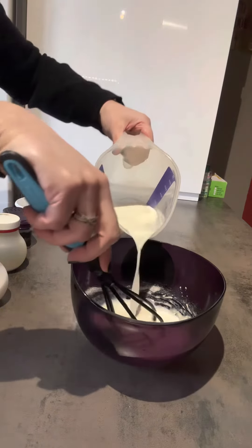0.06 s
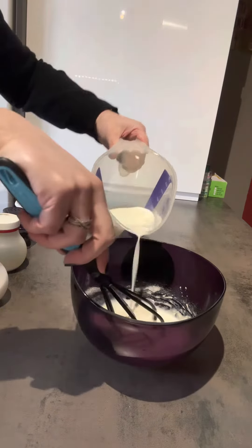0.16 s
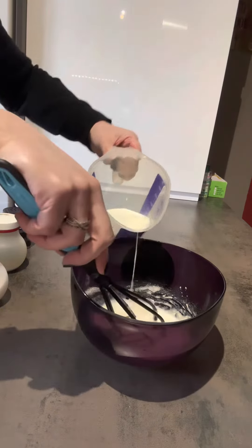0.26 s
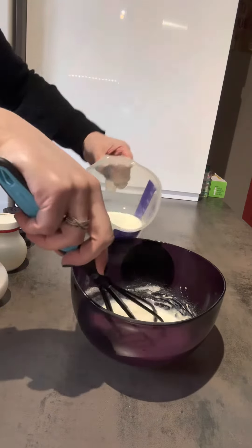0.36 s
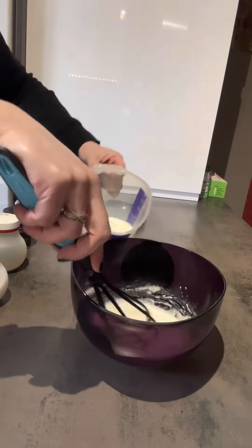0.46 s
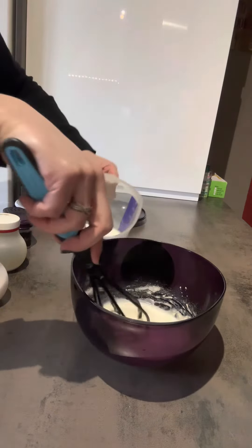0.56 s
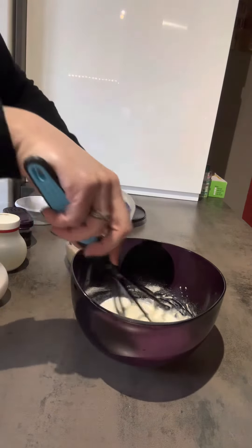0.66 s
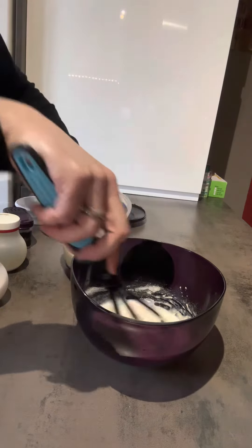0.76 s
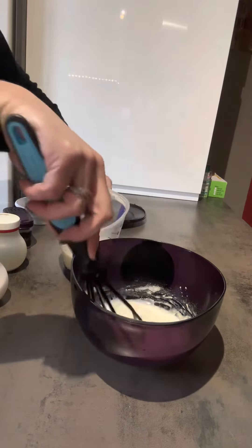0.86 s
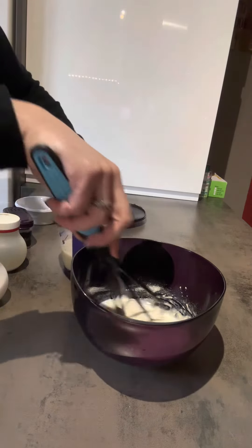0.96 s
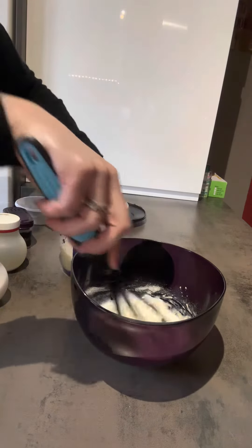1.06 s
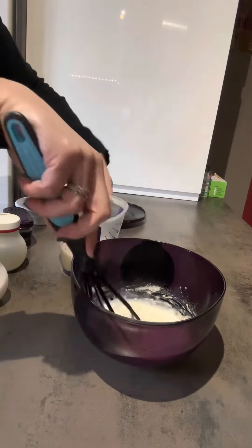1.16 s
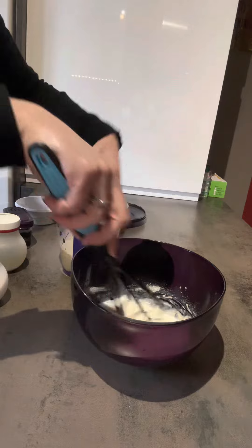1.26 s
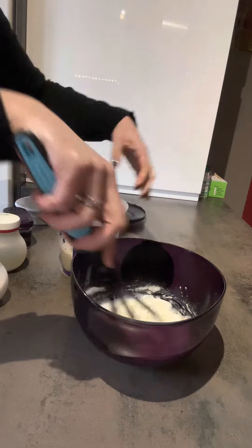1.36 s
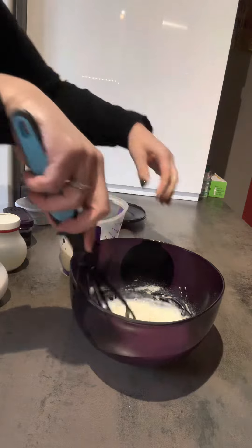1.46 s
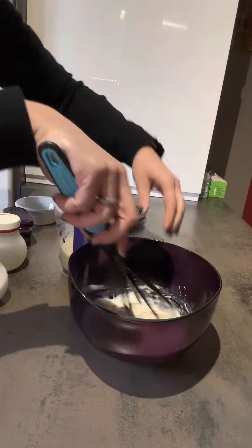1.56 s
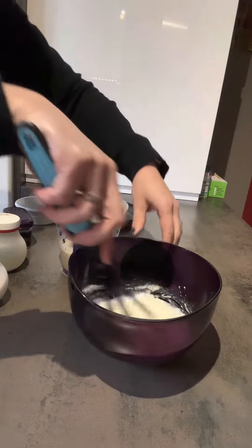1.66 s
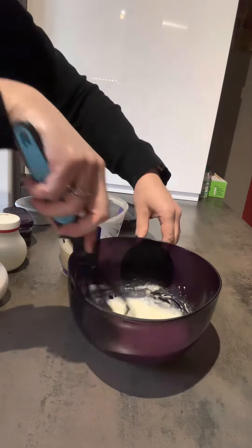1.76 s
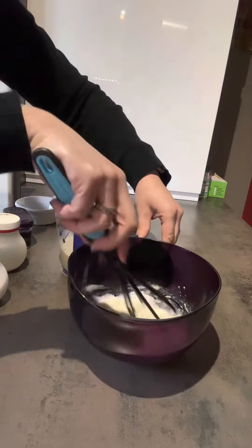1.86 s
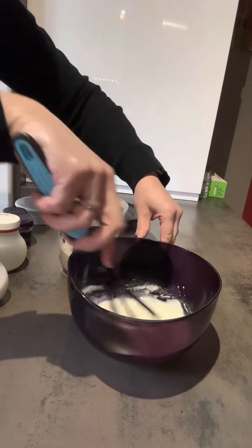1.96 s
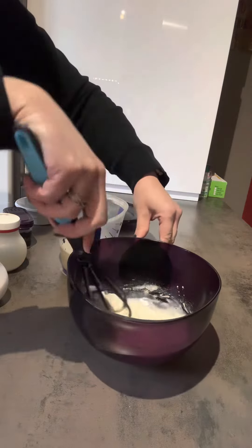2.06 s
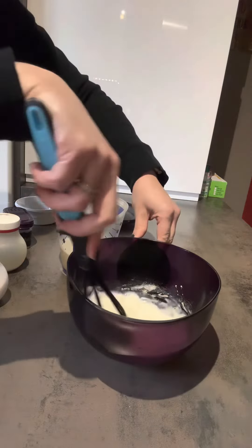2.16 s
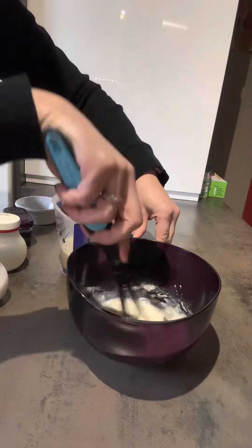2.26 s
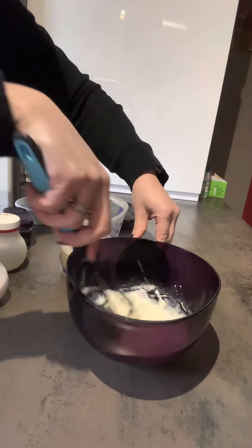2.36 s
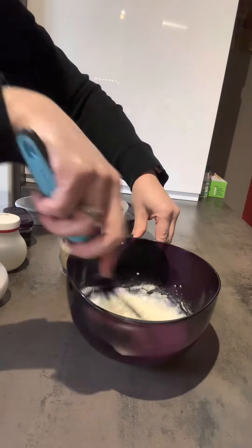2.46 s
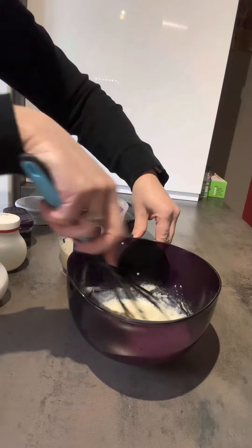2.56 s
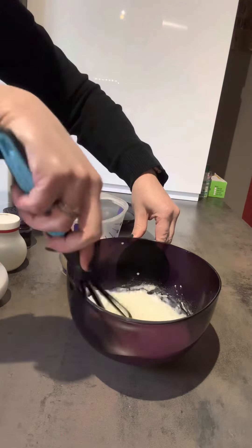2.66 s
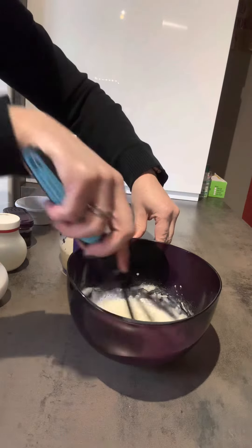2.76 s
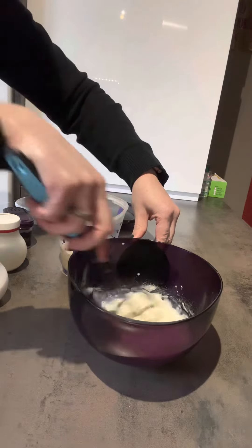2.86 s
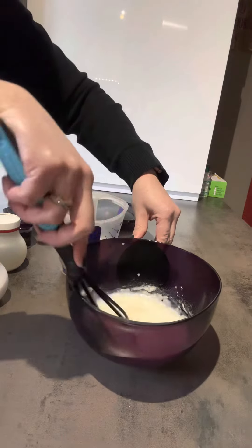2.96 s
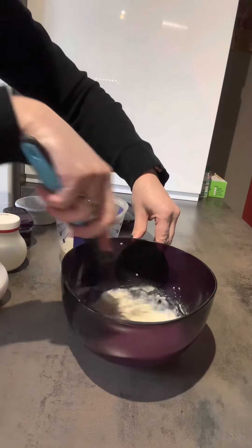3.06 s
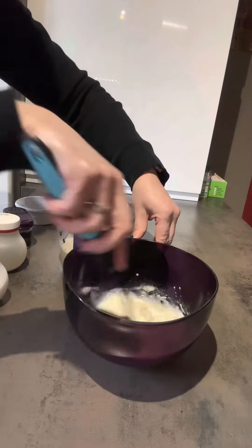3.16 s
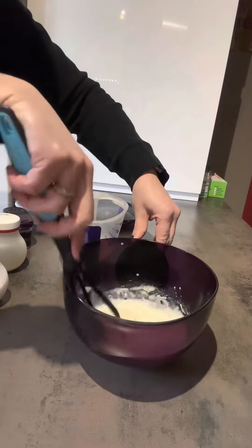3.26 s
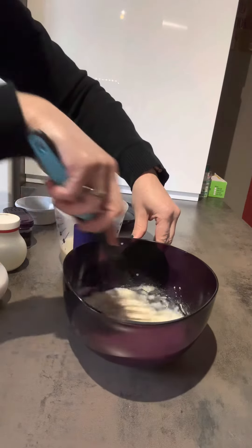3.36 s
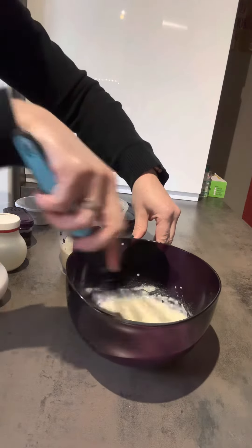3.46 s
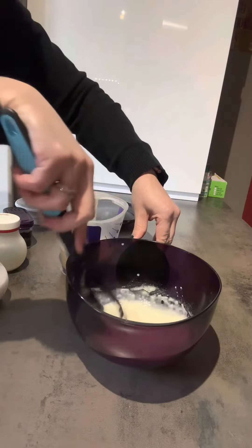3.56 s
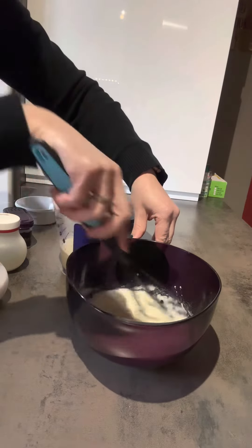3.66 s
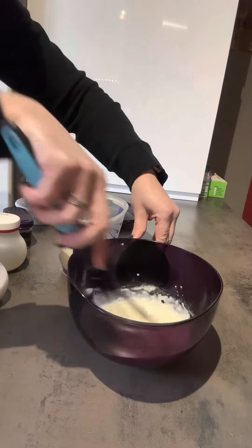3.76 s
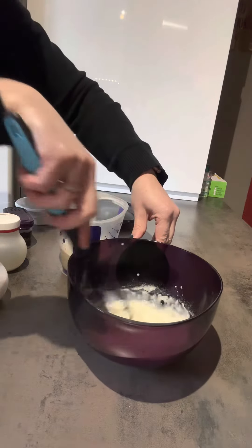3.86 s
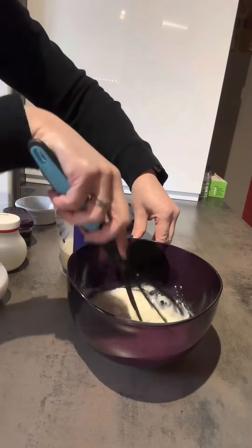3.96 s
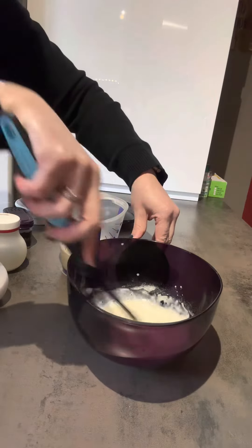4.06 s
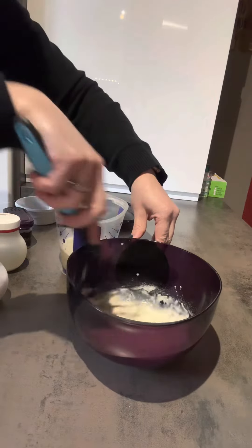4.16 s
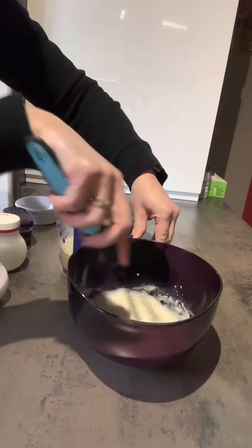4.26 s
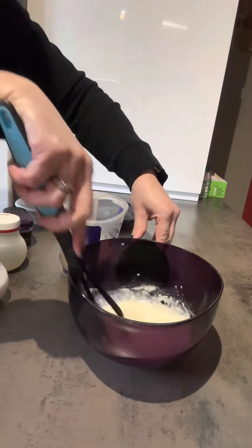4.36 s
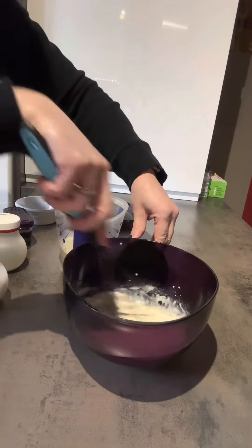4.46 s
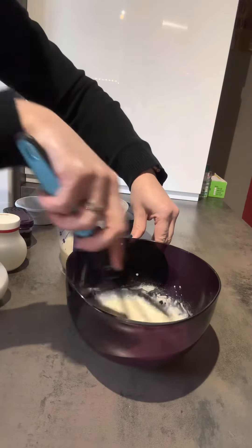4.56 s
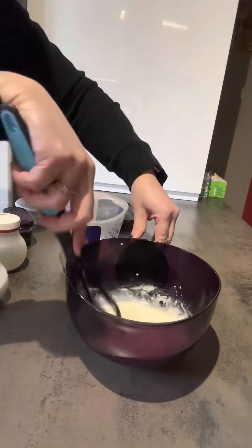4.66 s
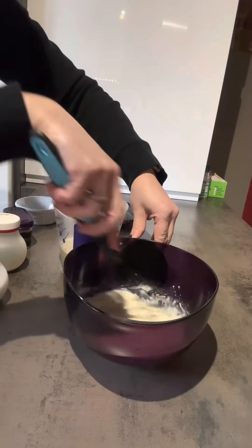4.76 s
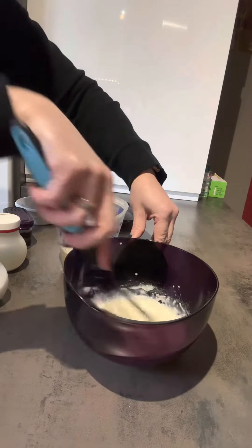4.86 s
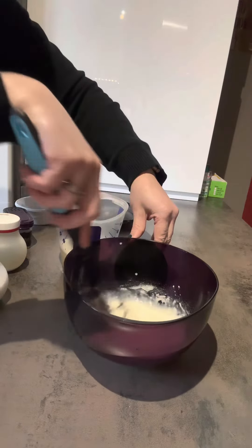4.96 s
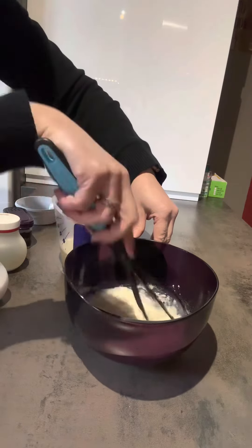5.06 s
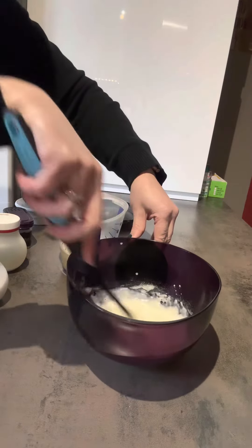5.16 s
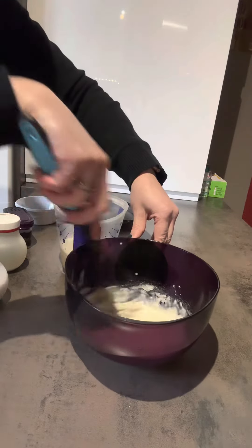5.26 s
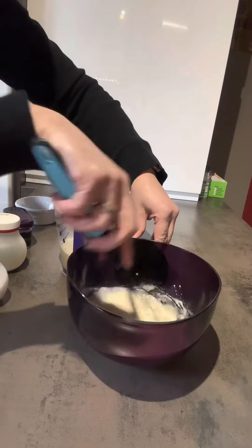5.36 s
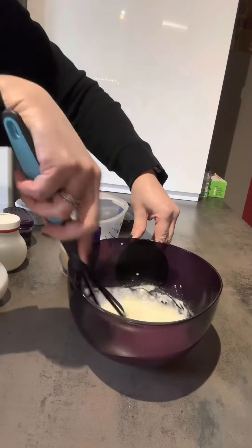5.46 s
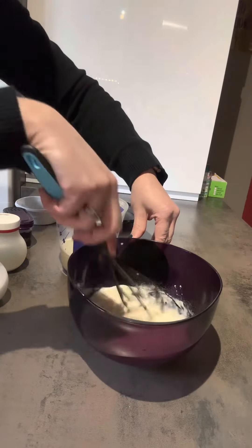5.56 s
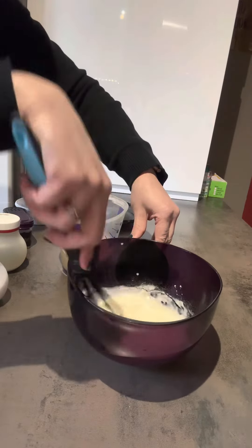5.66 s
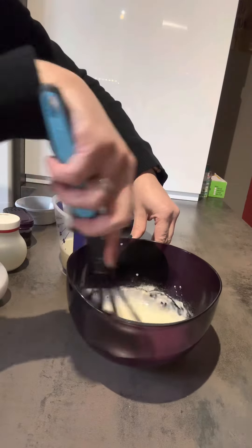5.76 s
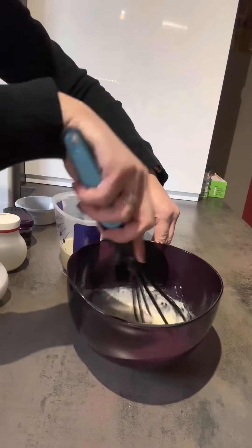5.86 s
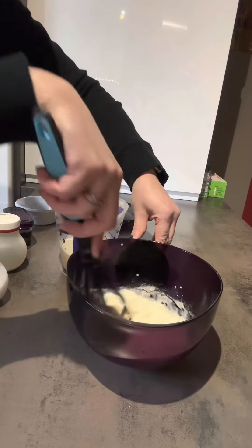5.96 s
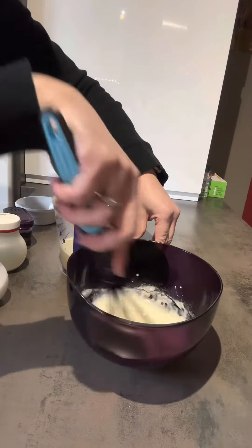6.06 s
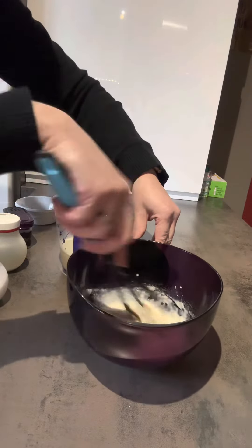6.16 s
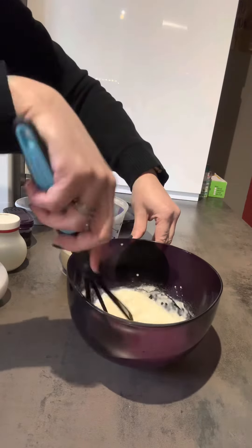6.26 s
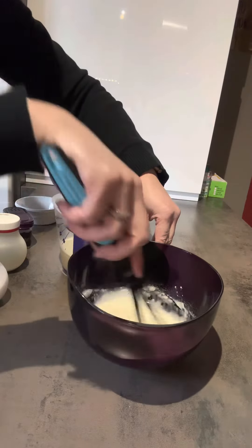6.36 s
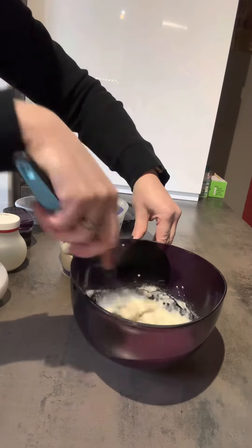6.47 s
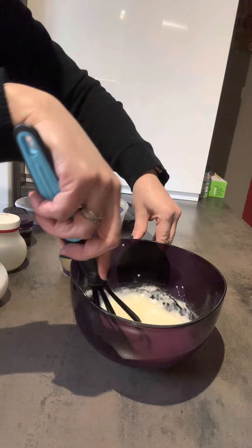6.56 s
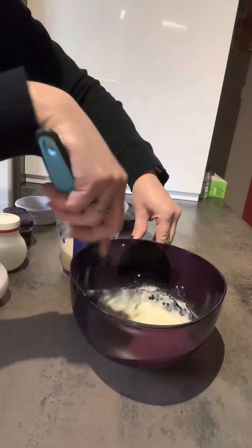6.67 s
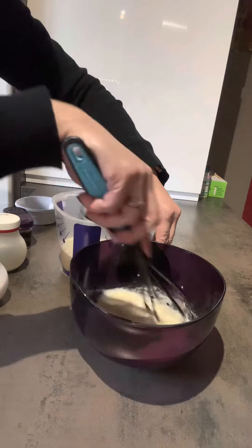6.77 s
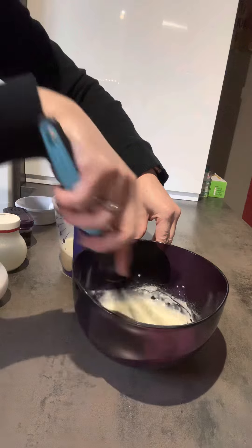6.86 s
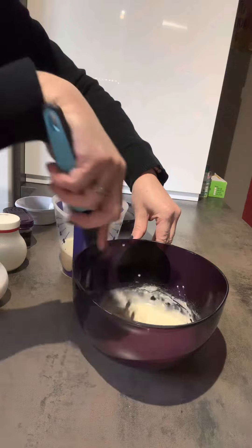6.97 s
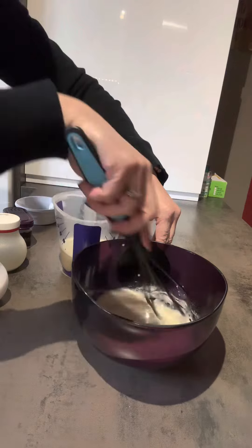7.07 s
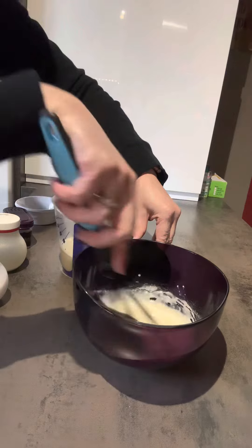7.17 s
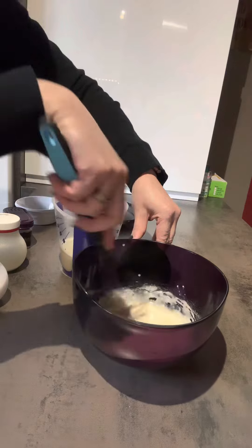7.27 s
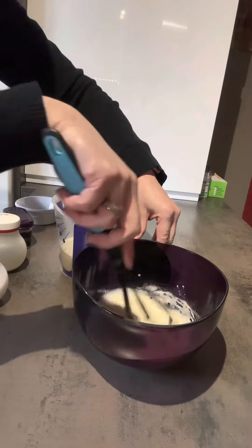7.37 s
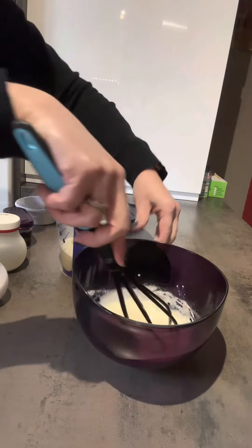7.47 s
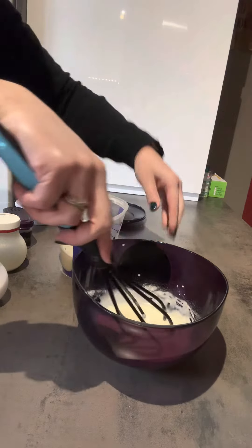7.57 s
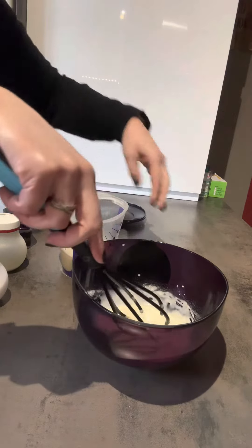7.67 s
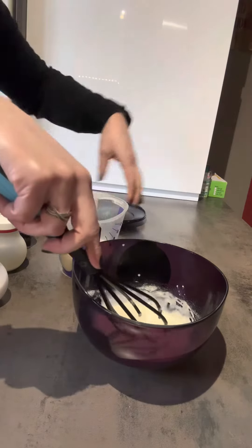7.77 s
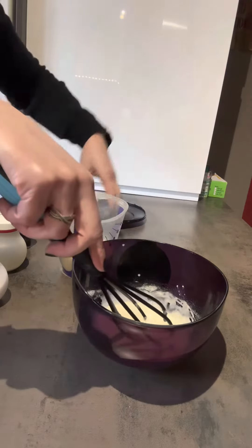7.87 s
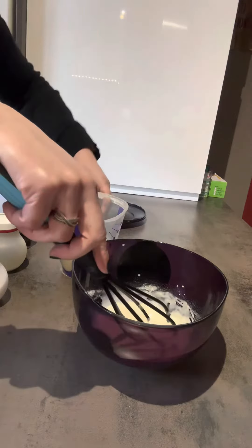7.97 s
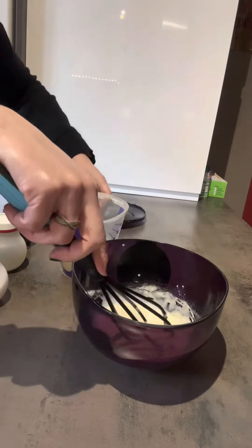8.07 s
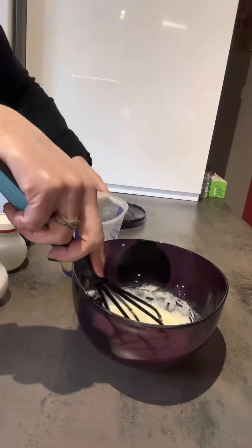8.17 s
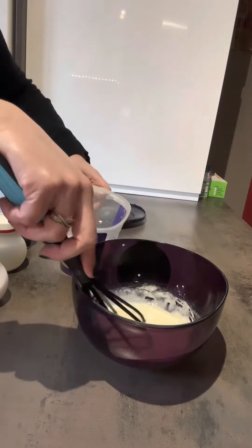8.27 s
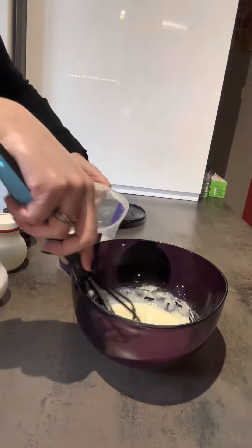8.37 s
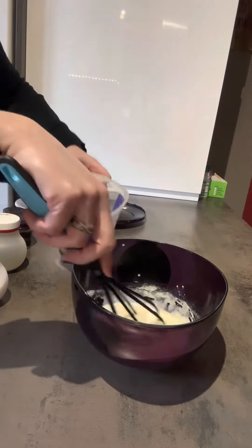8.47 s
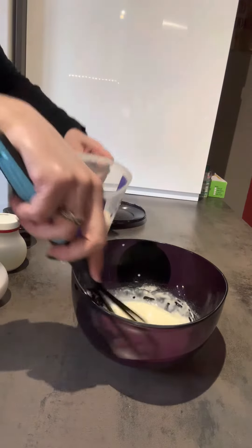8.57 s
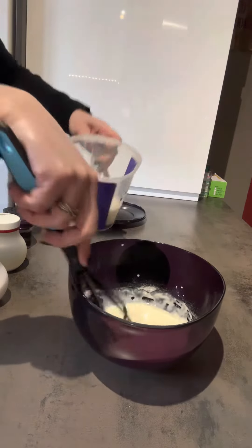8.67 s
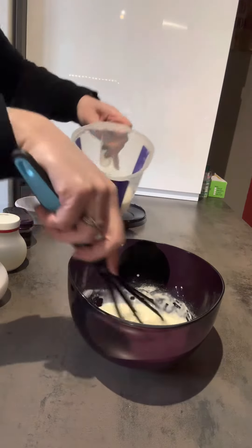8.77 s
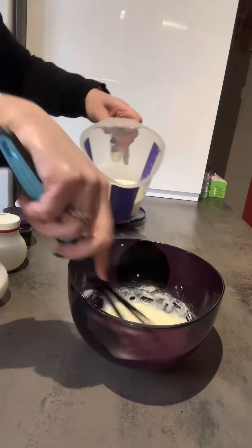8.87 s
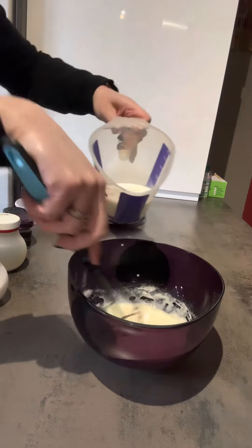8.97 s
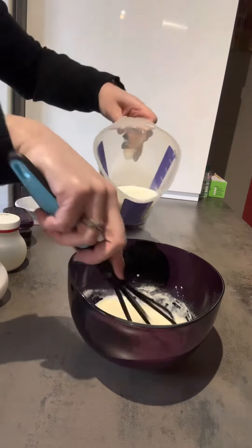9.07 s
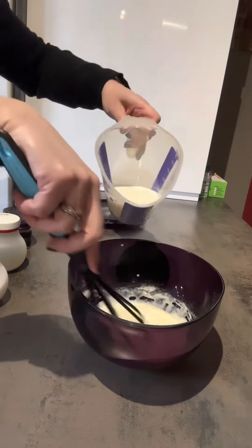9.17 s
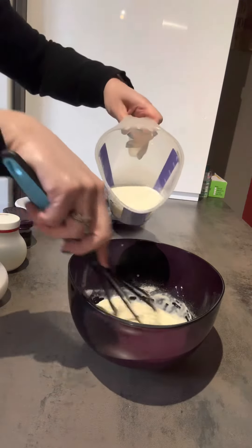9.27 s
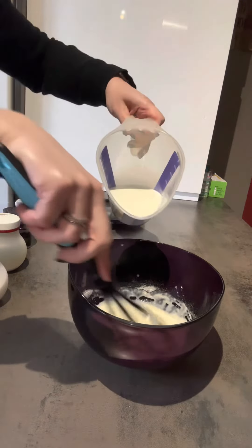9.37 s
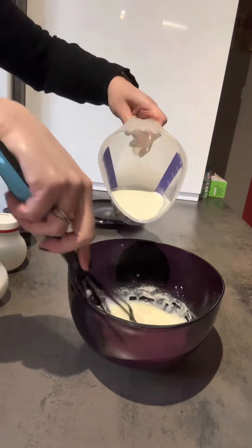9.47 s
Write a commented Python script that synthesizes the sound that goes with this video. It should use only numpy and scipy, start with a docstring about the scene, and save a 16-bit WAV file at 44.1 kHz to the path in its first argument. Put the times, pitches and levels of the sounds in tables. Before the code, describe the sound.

A wire whisk briskly beats thick, wet batter in a plastic bowl, with a plastic jug set down before and picked up after.

```python
"""Whisk in a plastic bowl

A whisk beats thick batter in a plastic bowl on a kitchen counter, close to the microphone.
Sticking and slipping wires scrape the wall in strokes; noise-driven resonances and rising tones make the batter
slop and drum, and now and then a knock rings the modes of the bowl. A plastic jug, also made of ringing modes,
is put down before the beating and picked up after a pause. A small room answers, over a low hum."""
import sys
import numpy as np
from scipy import signal
from scipy.fft import rfft, irfft, next_fast_len
from scipy.io import wavfile
from scipy.ndimage import uniform_filter1d, map_coordinates

SR = 44100
rng = np.random.default_rng(int(sys.argv[2]) if len(sys.argv) > 2 else 0)


def put_to_file(sound):
    """Save the sound as 16-bit audio at rate SR, in the file named by the first command-line argument."""
    columns = np.atleast_2d(sound).T  # one column per channel
    safe = np.clip(columns, -1, 1)
    whole_steps = np.round(safe * 32767)
    wavfile.write(sys.argv[1], SR, whole_steps.astype(np.int16))


N = 420273
TIME = np.arange(N) / SR


# Crackle of the wet batter, close up. Each row: frequency in [Hz], relative level in [dB per Hz].
FIZZ_SPECTRUM = [(400, -22.5), (1000, -25), (2000, 14), (3200, 9), (4100, -2), (6000, -10), (9000, -13),
                 (12500, -13), (13800, -14), (15000, -32.5)]


def scrape():
    """Ringing wires and the wet crackle of the batter, coloured by the bowl wall."""
    scraping, spraying = sweeps()
    crackle = unit(colour(grains(3000, 2.2) * amp(2.0 * drift(70)), FIZZ_SPECTRUM))
    contact = band(wires(), 1426, 7400, order=2) + amp(-3.0) * crackle + amp(-11.5) * froth()
    contact = muffle(contact, depth_db=2.0, patch_hz=608.0, patch_s=.07)
    sound = contact + wall(contact)
    body, treble = register(sound, 500, 4300), register(sound, 4300, 16000)
    # the hand never presses quite evenly
    uneven = amp(0.7 * drift(60))
    return uneven * (scraping * body * amp(1.0) + spraying * treble * amp(5.0))


# Each sweep of the wires along the wall. Each row: time of its peak in [s], length scale in [s],
# relative level of the scrape in [dB], relative level of the spray in [dB].
WALL_STROKES = [ (1.15, 0.079, -48, -61), (1.414, 0.3065, -47, -65), (1.775, 0.279, -48.5, -61),
                (1.982, 0.0859, -38, -53), (2.267, 0.0741, -39.5, -51), (2.396, 0.1736, -45.5, -70.5),
                (2.527, 0.084, -38, -58.5), (2.635, 0.1293, -42, -57.5), (2.741, 0.1796, -38.5, -54),
                (2.986, 0.0789, -35, -44.5), (3.077, 0.1208, -40.5, -53), (3.258, 0.189, -41, -51),
                (3.35, .12, -33.5, -46.5), (3.596, .17, -34, -47.5), (3.708, 0.1188, -39.5, -55.5),
                (3.843, 0.1118, -37.5, -49), (4.01, .12, -44.5, -54.5), (4.123, .12, -39, -47),
                (4.184, 0.0932, -34, -45.5), (4.269, 0.12, -41, -49.5), (4.399, 0.21, -36, -49),
                (4.614, 0.1531, -38, -48.5), (4.71, 0.065, -38.5, -50), (4.937, 0.1123, -38.5, -43.5),
                (5.016, 0.0995, -37, -49), (5.092, 0.1147, -39, -53), (5.189, .08, -37.5, -44.5),
                (5.28, .15, -34, -44.5), (5.477, 0.1264, -33.5, -43), (5.56, .08, -39, -52.5),
                (5.651, 0.0997, -38, -52.5), (5.852, 0.148, -35, -49.5), (5.938, .1, -43.5, -50),
                (6.12, 0.0895, -37.5, -51.5), (6.232, 0.098, -39, -50), (6.306, .1, -43, -49),
                (6.376, 0.0852, -37, -49), (6.456, 0.074, -41, -64), (6.614, 0.0701, -34, -40),
                (6.711, 0.12, -37, -44), (6.785, 0.076, -41.5, -47.5), (6.935, 0.059, -40, -37),
                (7.033, .17, -37.5, -45), (7.149, 0.055, -35, -52.5), (7.212, 0.0887, -37, -41.5),
                (8.485, 0.099, -50, -78), (8.76, 0.15, -45, -75), (8.904, 0.068, -40.5, -56.5),
                (9.007, 0.1182, -43.5, -79), (9.158, 0.062, -39.5, -59), (9.263, 0.086, -42, -81),
                (9.42, 0.0706, -40, -60)]
STROKE_RISE, STROKE_FALL = 0.38, 0.33  # shares of the length scale that set the swell and the dying away
SPRAY_DB, SPRAY_GROWTH = 4.5, 1.32  # between strokes the spray grows a little faster than the scrape


def sweeps():
    """Every stroke swells and dies away over the steady rubbing: gains of the scrape and of the spray."""
    rub = rubbing()
    scrape_power = rub ** 2
    spray_power = (amp(SPRAY_DB) * rub ** SPRAY_GROWTH) ** 2
    t = np.arange(-SR // 2, SR // 2) / SR
    for s, length, scrape_db, spray_db in WALL_STROKES:
        arch = np.exp(-(t / (length * np.where(t < 0, STROKE_RISE, STROKE_FALL))) ** 2)
        add(scrape_power, s + t[0], (amp(scrape_db) * arch) ** 2)
        add(spray_power, s + t[0], (amp(spray_db) * arch) ** 2)
    return np.sqrt(scrape_power), np.sqrt(spray_power)


# How hard the wires keep rubbing the wall between strokes, before and after the pause.
# Each row: time in [s], relative level of the scrape in [dB].
BEATING_LEVEL = np.array([(0.68, -53.5), (0.8, -59), (0.88, -53), (1.2, -53), (1.9, -55.5), (2.35, -46.5),
                 (3.3, -46), (4.8, -46.5), (5.7, -45.5), (6.45, -42.5), (6.55, -56.5), (6.68, -44),
                 (7.23, -42), (7.3, -55.5), (7.4, -58)])
STIRRING_LEVEL = np.array([(8.34, -61), (8.6, -49), (8.68, -54.5), (8.8, -48.5), (9.53, -52)])


def rubbing():
    """The steady contact of the wires with the wall, as gain."""
    return sum(swell(*curve.T, fade=.05) for curve in (BEATING_LEVEL, STIRRING_LEVEL))


# Resonances of a wire loop against the wall. Each row: centre before detuning in [Hz],
# width before detuning in [Hz], relative level in [dB].
WIRE_RESONANCES = [(1462, 66, -6), (2291, 68, 3.5), (3447, 100, -3), (4560, 400, -13), (5690, 250, -21),
                   (7960, 420, -20), (9500, 1500, -33.5)]


def wires(count=5, detune=0.047, slips_per_s=480, jitter=.5, touch_db=6.0, touches_per_s=45):
    """Each loop has its own pitch, touches the wall more or less, and sticks and slips while it does."""
    out = np.zeros(N)
    for place in np.linspace(-1, 1, count):
        rate = slips_per_s * np.exp(.3 * drift(12) + jitter * drift(400))
        # one slip at each whole count, of random strength
        slips = np.diff(np.floor(np.cumsum(rate) / SR), prepend=0) * rng.exponential(1, N)
        touch = amp(touch_db * drift(touches_per_s))
        drive = (unit(slips) + .5 * rng.standard_normal(N)) * touch
        out += resonate(drive, WIRE_RESONANCES, 1 + detune * place * (1 + abs(place)) / 2)
    return steady(wander(out, share=.03, per_s=14))


# The ring of the bowl wall under the wires. Each row: pitch about which it sways in [Hz], width in [Hz],
# relative level in [dB].
WALL_RESONANCES = [(2362, 180, -5), (3570, 310, -13)]
WALL_SWAY, WALL_SWAYS_PER_S = 0.052, 12  # typical share of the pitch, and new random values per second


def wall(x):
    """The wall rings along, at a pitch that sways as the wires travel over it."""
    out = 0
    stretch = np.cumsum(1 + WALL_SWAY * drift(WALL_SWAYS_PER_S)) / SR
    for hz, width, db in WALL_RESONANCES:
        turn = np.exp(2j * np.pi * hz * stretch)
        r = np.exp(-np.pi * width / SR)
        # shift the pitch to zero, smooth, and shift back: a resonance that can move
        ring = turn * signal.lfilter([1 - r], [1, -r], x * turn.conj())
        out = out + amp(db) * 2 * ring.real
    return out


def froth(count=2400, lo_hz=1700, hi_hz=7500, cycles=9, spread_db=5.5):
    """Tiny bubbles burst in the wake of the wires."""
    out = np.zeros(N)
    for when, pitch, size in rng.random((count, 3)):
        hz = lo_hz * (hi_hz / lo_hz) ** pitch
        level = amp(-spread_db * np.log(size + .03))  # a few are much louder
        add(out, when * N / SR, level * bubble(hz, cycles / hz, rise=.15))
    return unit(out)


def muffle(x, depth_db, patch_hz, patch_s):
    """The batter covers and bares the wires, so that registers swell and fade by turns."""
    hz, at, z = signal.stft(x, SR, nperseg=256)
    chance = rng.standard_normal((200, 1000))
    grid = np.meshgrid(hz / patch_hz, at / patch_s, indexing="ij")
    patches = map_coordinates(chance, grid, order=1, mode="mirror")
    return signal.istft(z * amp(depth_db * patches), SR, nperseg=256)[1][:N]


def register(x, lo_hz, hi_hz):
    """One register at an even level, filtered both ways so that neighbours join smoothly."""
    backward = band(x, lo_hz, hi_hz, order=2)[::-1]
    return steady(band(backward, lo_hz, hi_hz, order=2)[::-1], size=1800)


# A wire catches and snaps free. Each row: start in [s], relative level in [dB].
WIRE_CATCHES = [(2.968, -27), (4.289, -25), (6.119, -3.5), (6.602, -23), (6.689, -9), (6.923, -28)]


def catches(t60=0.027, ring=1.0):
    """A short bright snap that also rings the wire."""
    out, t = np.zeros(N), np.arange(4000) / SR
    for s, db in WIRE_CATCHES:
        snap = band(rng.standard_normal(len(t)) * amp(-60 * t / t60), 2000, 8000, order=1)
        sound = unit(snap) + ring * unit(resonate(snap, WIRE_RESONANCES))
        add(out, s, amp(db) * sound / np.std(sound[:SR // 200]))
    return out


# Resonances of the loaded bowl, then of pockets in the batter (these wander a little in pitch).
# Each row: centre in [Hz], width in [Hz], relative level in [dB].
DRUM_RESONANCES = [(147, 12, -7.5), (289, 59, -15.5)]
SLOP_RESONANCES = [(438, 30, -13), (575.4, 25, 0.5), (658, 33, 1.5), (910, 250, -15.5), (1217, 120, -0.5)]
# The whisk drags a pocket of air into the batter. Each row: start in [s], length in [s], relative level of the
# gulp in [dB], share by which its pitch starts low, least level of a slop bubble in [dB].
AIR_GULPS = [(2.755, 0.095, -41, 0.34, -47), (2.895, 0.28, -42.5, 0.65, -48), (3.056, 0.13, -42, 0.41, -49),
             (3.366, 0.19, -41, 0.13, -52), (3.623, 0.087, -37.5, 0.59, -45),
             (4.181, 0.16, -38.5, 0.3, -43), (4.444, 0.15, -42.5, 0.6, -48.5),
             (4.754, 0.09, -45, 0.44, -51.5), (5.001, 0.21, -40.5, 0.45, -44),
             (5.275, 0.23, -40.5, .6, -46.5), (5.643, 0.14, -41, .3, -55), (5.843, 0.12, -46.5, 0.4, -56),
             (6.103, 0.11, -43.5, 0.62, -44), (6.355, 0.16, -40.5, 0.35, -44), (6.611, 0.19, -51, 0.3, -43),
             (6.72, 0.16, -38.5, 0.34, -44), (7.04, 0.1, -38.5, 0.23, -47.5), (7.319, 0.13, -44, 0.18, -59)]
GULP_HZ, SLOP_HZ = 142, 540.5  # pitches about which big pockets and small bubbles vary
SLOP_SPREAD_S = .06  # small bubbles burst over this time, just after a gulp begins


def batter(count=3):
    """Soft lumps drum and pop all through the stirring; each gulp brings a slop of bubbles, tending upward."""
    lumps = unit(band(resonate(grains(290, 2.3), DRUM_RESONANCES), 110, 660, order=2))
    popping = wander(resonate(grains(340, 2.4), SLOP_RESONANCES), share=.06, per_s=12)
    pops = unit(band(popping, 360, 1500, order=2))
    out = sweeps()[0] ** 0.16 * (amp(-55.5) * lumps + amp(-46.0) * pops)
    for s, length, gulp_db, rise, slop_db in AIR_GULPS:
        overtone_db = -9 + 4 * rng.standard_normal()
        pocket = gulp(GULP_HZ, length, rise, overtone_db, rough=0.33)
        add(out, s, amp(gulp_db - 1.0) * pocket)
        for k, (when, pitch, size) in enumerate(rng.random((count, 3))):
            late = (k + when) / count
            hz = SLOP_HZ * (1 + 0.27 * (late - .5) + .25 * (pitch - .5))
            level = amp(slop_db + 8.1 * size)
            add(out, s + 0.0074 + SLOP_SPREAD_S * late, level * bubble(hz, t60=.075, rise=0.22))
    return out


CLOSING_S = 0.019  # sets how fast a pocket closes, varied at each gulp


def gulp(hz, length, rise, overtone_db, rough):
    """A pocket in the batter rings unevenly and rises in pitch as it closes."""
    t = np.arange(int(length * SR)) / SR
    closing = CLOSING_S * rng.uniform(.6, 1.4)
    tight = 1 - rise * np.exp(-(t / closing / 2) ** 2)  # a tighter pocket rings higher and louder
    turns = np.cumsum(hz * rng.uniform(0.98, 1.05) * tight) / SR
    a, b, c, d = (np.interp(t * hz / 2, np.arange(len(k)), k) for k in rng.standard_normal((4, 200)))
    tone = np.exp(2j * np.pi * turns)
    overtone = amp(overtone_db) * (1 + rough * (c + 1j * d)) * tone ** 2
    sound = (1 + rough * (a + 1j * b)) * tone + overtone
    envelope = np.sin(np.pi * (t / length) ** 0.5) ** 2
    return tight ** 1.5 * sound.real / np.sqrt(1 + 2 * rough ** 2) * envelope


def bubble(hz, t60, rise):
    """A bubble starts quickly and rises in pitch as it dies."""
    t = np.arange(int(t60 * SR) + 2) / SR
    envelope = amp(-60 * t / t60) * (1 - np.exp(-t * hz))
    return envelope * np.sin(2 * np.pi * hz * t * (1 + rise * t / t60 / 2))


# The whisk hits the bowl; then the jug meets the counter or rocks on it.
# Each row: start in [s], relative levels of thud, hollow knock, clack and tick in [dB], ring time as a factor,
# hollow pitch in [Hz], relative boom level in [dB], boom length in [s], boom pitch in [Hz].
BOWL_HITS = [(2.885, -31, -20.5, -19, -30, 0.69, 813, -25, 0.024, 280),
             (4.322, -35, -31, -30, -54, 0.73, 930, -42, 0.073, 269),
             (5.634, -30.5, -28, -22, -37, 0.77, 845, -33, .1, 293.4),
             (7.316, -50.5, -50, -38.5, -36.5, 1.4, 654, -59, 0.038, 283)]
JUG_HITS = [(0.557, -41, -41.5, -48.5, -56.5, 0.5, 413, -37, 0.093, 244),
            (0.617, -28, -33, -51.5, -60, 0.88, 640, -13.5, 0.043, 269.5),
            (1.037, -36, -20.5, -37, -60, 0.72, 712, -19.5, 0.044, 271.6),
            (1.106, -58, -36.5, -56, -70, 0.5, 770, -43, 0.093, 270),
            (8.215, -40, -33.5, -34, -49.5, 0.54, 790, -29.5, 0.1, 263),
            (8.527, -37.5, -33.5, -33, -47, 0.8, 729, -31, 0.033, 305)]
# Ringing modes of each. Each row: pitch before a small random shift in [Hz], mean relative level in [dB],
# time to fall 60 dB before the ring factor in [s].
BOWL_MODES = [(144, -18, 0.14), (292, -4, 0.08), (615, -2.5, 0.087), (1097, 0, 0.041), (1268, 0.5, 0.069),
              (1545, 0.5, 0.07), (1880, 0, 0.071), (2540, -2, 0.13), (3710, 2.5, 0.064)]
JUG_MODES = [(127, -21, 0.25), (258, -12, 0.18), (356, -12, 0.063), (541.4, -9, 0.13), (683, -6.5, 0.19),
             (796, -6, 0.18), (1071, -7, 0.13), (1303, -1.5, 0.07), (1508, 13.5, 0.026), (1870, -2, 0.13),
             (2492, 1, 0.082)]
# Edges in [Hz] of the four registers: thud, hollow knock, clack and tick.
KNOCK_REGISTERS = [80, 420, 1100, 3500, 15000]


def knocks(rows, modes, hollow_db, hollow_t60, rattle_db, rattle_t60, tick_t60, bass_rise, gain_db,
           chatter_db, spread_db):
    """A blow rings the modes over a chattering plastic rattle, and the thin base booms briefly."""
    out, t = np.zeros(N), np.arange(SR // 2) / SR
    for s, *levels, length, hollow_hz, boom_db, boom_s, boom_hz in rows:
        # where it lands sets the hollow pitch and the weight of each mode and register
        chance = rng.standard_normal((len(modes), 2))
        struck = [(hz * (1 + 0.02 * a), db + spread_db * b, t60) for (hz, db, t60), (a, b) in zip(modes, chance)]
        struck.append((hollow_hz, hollow_db, hollow_t60))
        ring = ringing(t, struck, length)
        # the first contact is the firmest
        contacts = np.r_[1, .5, rng.standard_normal(len(t) - 2) - .5]
        chatter = np.interp(t * 260, np.arange(len(t)), contacts)
        rattle_level = amp(rattle_db + chatter_db * chatter - 60 * t / (rattle_t60 * length))
        blow = ring + rng.standard_normal(len(t)) * rattle_level
        blow = blow * (1 - np.exp(-t / 0.0028))  # a soft onset over a few milliseconds
        parts = [band(blow, lo, hi, order=4) for lo, hi in zip(KNOCK_REGISTERS, KNOCK_REGISTERS[1:])]
        parts[0] = parts[0] * (1 - np.exp(-t / bass_rise))  # the bass builds up late
        # the contact itself is brief
        parts[-1] = band(parts[-1], 1400, 3200, order=1) * amp(-60 * t / tick_t60)
        levelled = [amp(db + gain_db) * part / np.std(part[:SR // 33]) for db, part in zip(levels, parts)]
        add(out, s, sum(levelled))
        flex = np.sin(np.pi * np.minimum(t / boom_s, 1) ** .5) ** 2  # damped as the base settles flat
        add(out, s, amp(boom_db) * flex * np.sin(2 * np.pi * boom_hz * t))
    return out


def ringing(t, modes, length):
    """Modes struck together die away, each at its own pace."""
    return sum(amp(db - 60 * t / (t60 * length)) * np.sin(2 * np.pi * hz * t) for hz, db, t60 in modes)


# A load is put on or taken off the counter. Each row: start in [s], relative level in [dB],
# ring time as a factor.
COUNTER_THUMPS = [(0.624, -32, 1.7), (1.042, -45, 0.45), (8.243, -34, 0.43), (8.562, -33, 0.37)]
# Modes of the counter. Each row: pitch in [Hz], relative level in [dB],
# time to fall 60 dB before the ring factor in [s].
COUNTER_MODES = [(53, -7.5, 1.0), (85.4, -14, 0.14), (121, -9.5, 0.55), (148, -1, 0.21)]


def counter():
    """The counter booms under the heavier knocks; the jug drags a little as it is lifted."""
    drag = unit(band(resonate(grains(490, 1.2), [(253, 110, 4.0), (600, 150, -20.0)]), 146, 870))
    drag_s, drag_db = [8.125, 8.15, 8.21, 8.25, 8.3, 8.37], [-45.5, -48, -39.0, -33.0, -50, -70.0]
    out = drag * swell(drag_s, drag_db, fade=0.032)
    t = np.arange(SR // 2) / SR
    for s, thump_db, length in COUNTER_THUMPS:
        boom = ringing(t, COUNTER_MODES, length)
        add(out, s, amp(thump_db) * boom * (1 - t / t[-1]))
    return band(out, 48.0, 830, order=4)


# Light ticks, as when the resting whisk taps the rim. Each row: start in [s], relative level in [dB].
RIM_TAPS = [(0.221, -36.5), (7.498, -40), (7.84, -57.5)]


def taps(ping_hz=2600, ping_db=-10, ping_t60=0.052, click_t60=0.036):
    """A dry click with a faint ping of wire."""
    out, t = np.zeros(N), np.arange(SR // 5) / SR
    ping = amp(ping_db - 60 * t / ping_t60) * np.sin(2 * np.pi * ping_hz * t)
    for s, db in RIM_TAPS:
        click = band(rng.standard_normal(len(t)), 1600, 13000, order=1) * amp(-60 * t / click_t60)
        add(out, s, amp(db - 11.0) * (click + ping))
    return out


def sleeve():
    """A sleeve rustles as the arm moves with the jug and back to it."""
    cloth = unit(band(grains(2100, 2.2), 520, 2500, order=2)) * amp(1.4 * drift(36))
    leaving = swell([.26, .42, .55], [-74, -69, -64], fade=0.045)
    returning = swell([8.08, 8.13, 8.2], [-80, -73, -63], fade=0.1)
    return cloth * (leaving + returning)


def circling(x, count=4, turns_per_s=3.3):
    """The whisk circles in the bowl at a drifting pace, so its reflections keep changing."""
    place = count * (turns_per_s * TIME + 0.448 * drift(3))
    away = [np.minimum(abs((place - k + count / 2) % count - count / 2), 1) for k in range(count)]
    return sum(room(x * np.cos(np.pi / 2 * d), wet_db=-7, early_db=1) for d in away)


# Reverberation of the small kitchen. Each row: frequency in [Hz], time to fall 60 dB in [s].
ROOM_DECAY = [(100, 0.46), (300, 0.27), (800, 0.38), (2500, 0.35), (6000, 0.22), (14000, 0.016)]
PORT_LAG = 4  # samples by which the right port of the microphone hears later


def room(x, wet_db, early_db):
    """Direct sound reaches the left port first; near surfaces and a short diffuse tail follow."""
    size = SR // 2
    t = np.arange(size) / SR
    echoes = rng.choice([-1., 1.], (2, size)) * (rng.random((2, size)) < 4000 / SR)
    hz, at, z = signal.stft(echoes * (t > .008), SR, nperseg=256)
    decay = amp(-60 * at / read(ROOM_DECAY, hz)[:, None])
    tail = signal.istft(z * decay, SR, nperseg=256)[1][:, :size]
    early = rng.standard_normal((2, size)) * np.exp(-t / 0.0044) * (t > .0006)
    response = sum(amp(db) * r / np.linalg.norm(r[0]) for db, r in ((wet_db, tail), (early_db, early)))
    direct = np.array([x, np.r_[np.zeros(PORT_LAG), x[:-PORT_LAG]]])
    heard = direct + signal.fftconvolve(x[None], diffuse(response), axes=1)[:, :N]
    return heard / np.sqrt(1 + amp(wet_db) ** 2 + amp(early_db) ** 2)


# Likeness of diffuse sound at the two ports. Each row: frequency in [Hz], correlation from -1 to 1.
PORT_LIKENESS = [(100, 0.48), (300, 0.83), (600, -0.54), (1500, -0.0067), (4000, 0.31), (8500, 0.56),
                 (13000, 1)]


def diffuse(pair):
    """Two unrelated sounds become what two close ports hear: alike by a share that varies with pitch."""
    size = next_fast_len(2 * pair.shape[1])
    a, b = rfft(pair, size)
    same = np.clip(read(PORT_LIKENESS, np.fft.rfftfreq(size, 1 / SR)), -1, 1)
    return irfft(np.array([a, same * a + np.sqrt(1 - same ** 2) * b]), size)[:, :pair.shape[1]]


# Background air of the kitchen. Each row: frequency in [Hz], relative level in [dB per Hz].
AIR_SPECTRUM = [(20, -35.5), (35, -22), (50, -11.5), (75, -11), (120, -10), (180, -7), (260, -12),
                (400, -11.5), (480, -21), (1200, -32.5), (3000, -44.5), (7000, -51.5), (13000, -51),
                (15000, -60.5)]
# Hum of an appliance. Each row: mean pitch in [Hz], RMS level in [dB].
HUM_TONES = [(50, -62.5), (162, -67), (183, -63)]
AIR_DB = -60.0  # RMS level


def kitchen():
    """Low room noise and the wavering hum of an appliance."""
    air = unit(diffuse(colour(rng.standard_normal((2, N)), AIR_SPECTRUM)))
    hum = 0
    for hz, db in HUM_TONES:
        phase = 2 * np.pi * hz * TIME + hz / 200 * drift(5)
        hum = hum + amp(db) * np.sqrt(2) * np.sin(phase)
    return amp(AIR_DB) * air + hum


def amp(db):
    """Decibels as a factor of amplitude."""
    return 10 ** (np.asarray(db) / 20)


def unit(x):
    """Scales a sound to an RMS level of one."""
    return x / np.sqrt(np.mean(x ** 2) + 1e-20)


def read(points, hz):
    """Reads a curve between its points, along a logarithmic frequency axis."""
    f, value = np.transpose(points)
    return np.interp(np.log(hz + 1), np.log(f + 1), value)


def add(mix, s, sound):
    """Lays a sound into the mix from second s."""
    part = mix[max(round(s * SR), 0):][:len(sound)]
    part += sound[:len(part)]


def band(x, lo_hz, hi_hz, order=3):
    """Keeps the frequencies between two edges."""
    sos = signal.butter(order, [lo_hz, min(hi_hz, .48 * SR)], "band", fs=SR, output="sos")
    return signal.sosfilt(sos, x)


def colour(x, points):
    """Shapes the spectrum of a sound by the curve in points."""
    size = next_fast_len(N)
    gain = amp(read(points, np.fft.rfftfreq(size, 1 / SR)))
    return irfft(rfft(x, size) * gain, size)[..., :N]


def resonate(x, resonances, stretch=1):
    """Parallel resonances, all shifted by one factor."""
    out = 0
    for hz, width, db in resonances:
        out = out + amp(db) * signal.lfilter(*signal.iirpeak(hz * stretch, hz / width, SR), x)
    return out


def drift(per_s):
    """Straight lines between random values, drawn at unit spread."""
    knots = rng.standard_normal(4000)
    return np.interp(TIME * per_s, np.arange(len(knots)), knots)


def grains(per_s, spread_db):
    """Random clicks, most small and a few large."""
    size = amp(spread_db * np.minimum(rng.exponential(1, N), 4))
    return unit(size * rng.choice([-1, 1], N) * (rng.random(N) < per_s / SR))


def swell(s, db, fade=0.15):
    """A level curve as gain, with a 25 dB fade at each end and silence beyond."""
    times = np.r_[s[0] - fade, s, s[-1] + fade]
    levels = np.r_[db[0] - 25, db, db[-1] - 25]
    return amp(np.interp(TIME, times, levels, left=-np.inf, right=-np.inf))


def wander(x, share, per_s):
    """Bending shifts all resonances up and down together."""
    bend = share * drift(per_s)
    return map_coordinates(x, [np.cumsum(1 + bend - bend.mean())], order=3, mode="mirror")


def steady(x, size=3500):
    """Evens out the slow level and keeps the grain; size is in samples."""
    return x / np.sqrt(abs(uniform_filter1d(x ** 2, size)) + 1e-12)


def scene():
    """Whisk, batter and knocks, heard in the small kitchen."""
    jug = knocks(JUG_HITS, JUG_MODES, hollow_db=8.5, hollow_t60=0.052, rattle_db=4.5, rattle_t60=0.27,
                 tick_t60=0.02, bass_rise=0.0054, gain_db=0.5, chatter_db=7.0, spread_db=1.0)
    bowl = knocks(BOWL_HITS, BOWL_MODES, hollow_db=6, hollow_t60=0.058, rattle_db=11.0, rattle_t60=0.091,
                  tick_t60=.02, bass_rise=0.0022, gain_db=-7.5, chatter_db=7.5, spread_db=5.0)
    lean = amp([[-.5], [.5]])  # slightly louder on the right
    whisk = amp(1.0) * lean * circling(scrape() + amp(-29.0) * catches())
    whisk = whisk + room(bowl, wet_db=-11, early_db=-7)
    blows = room(jug + counter() + taps() + sleeve(), wet_db=-7, early_db=-5)
    return whisk + room(batter(), wet_db=-10, early_db=-7) + blows + kitchen()


CUT_HZ = 15800  # upper band limit


def record(dry):
    """The microphone softens the highest treble; then the band limit."""
    soft = signal.sosfilt(signal.butter(6, 13500, fs=SR, output="sos"), dry)
    limit = signal.firwin(511, CUT_HZ, window=("kaiser", 9), fs=SR)
    return signal.oaconvolve(soft, limit[None], "same")


dry = scene()
out = record(dry)
put_to_file(out)
```